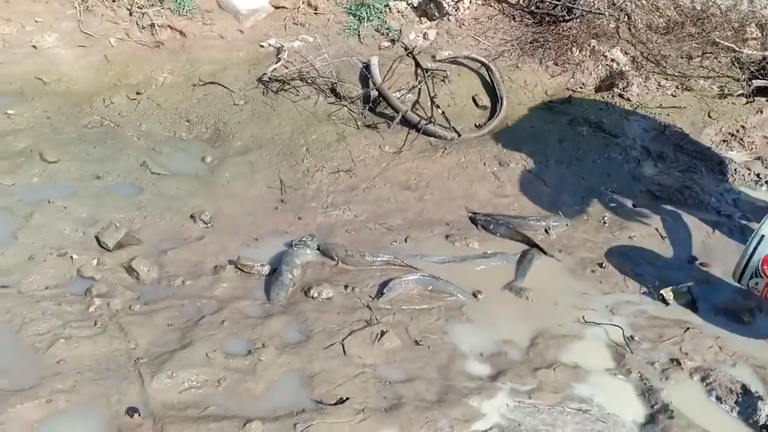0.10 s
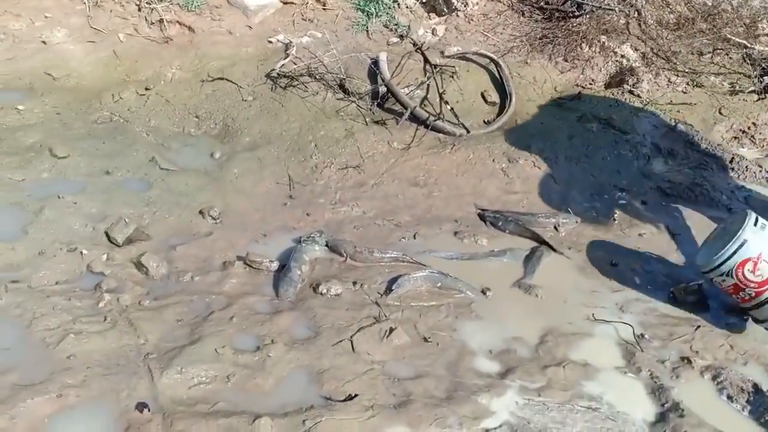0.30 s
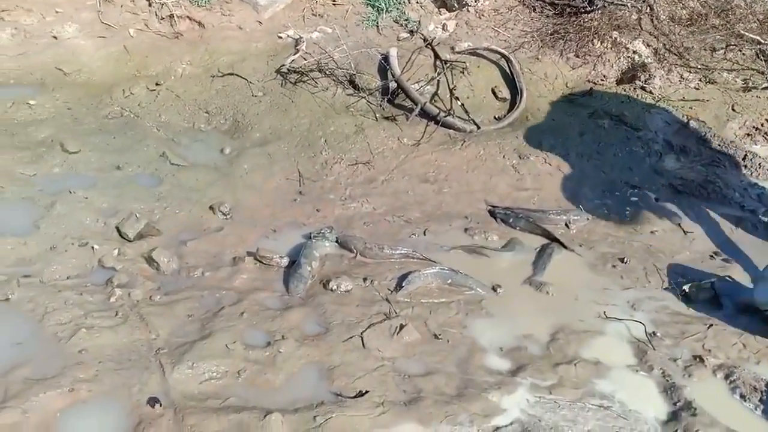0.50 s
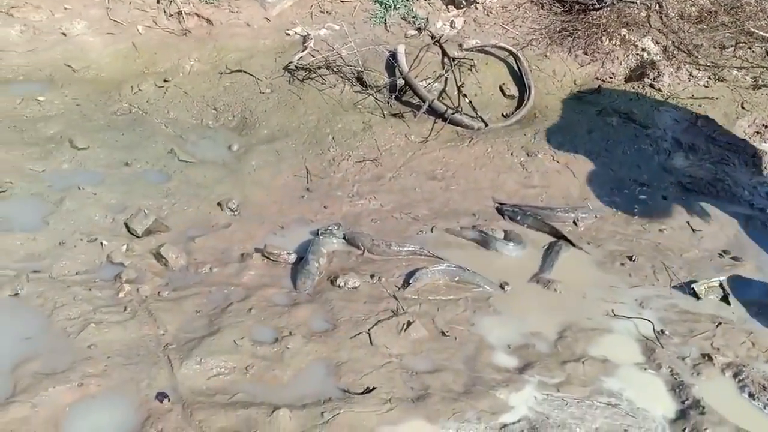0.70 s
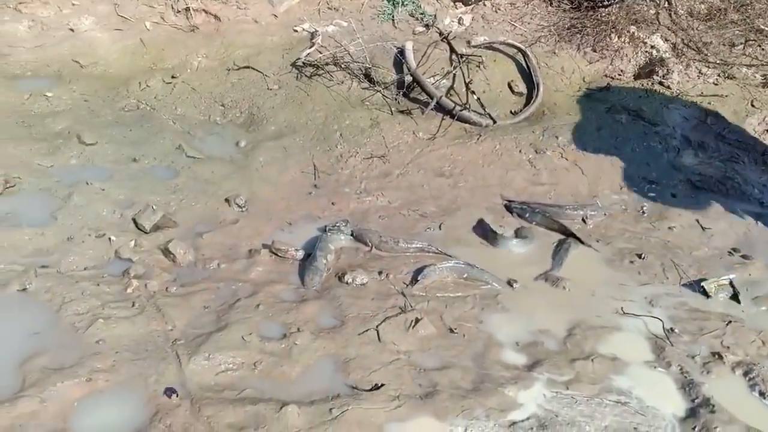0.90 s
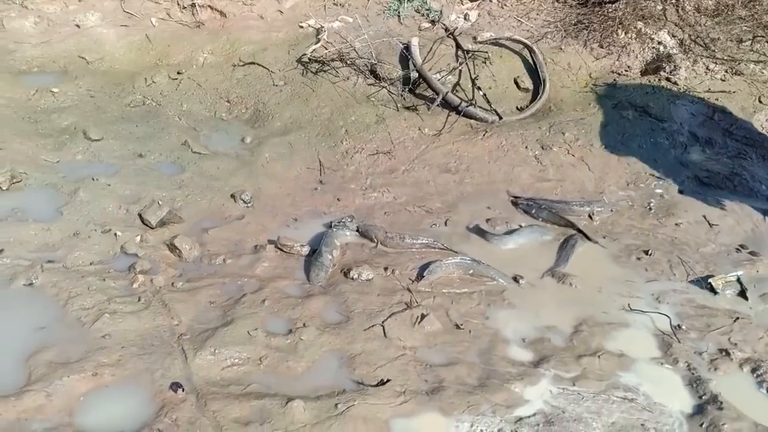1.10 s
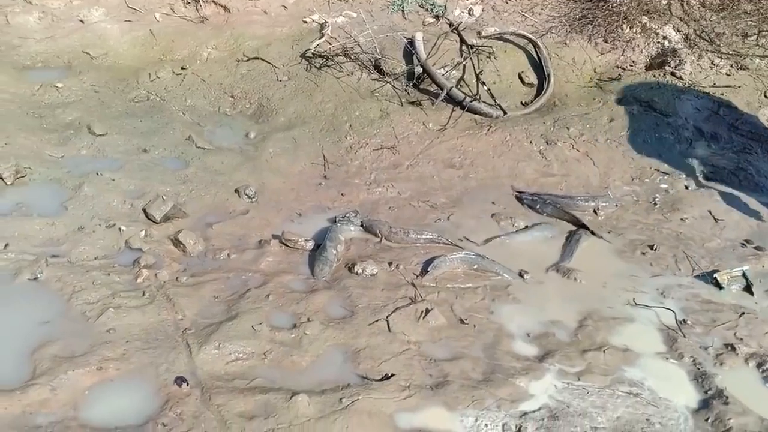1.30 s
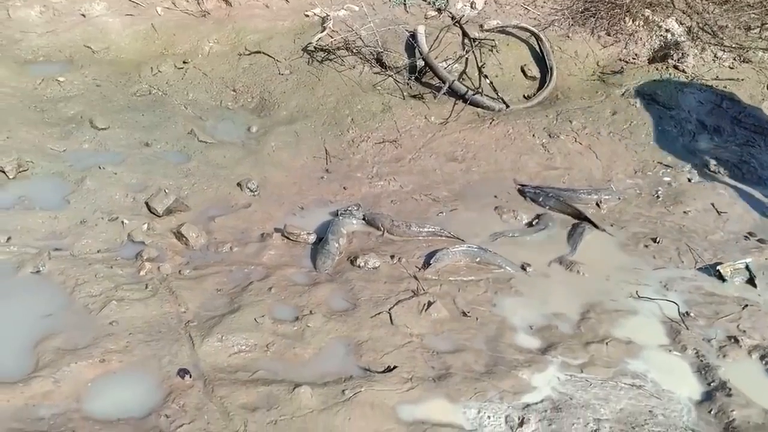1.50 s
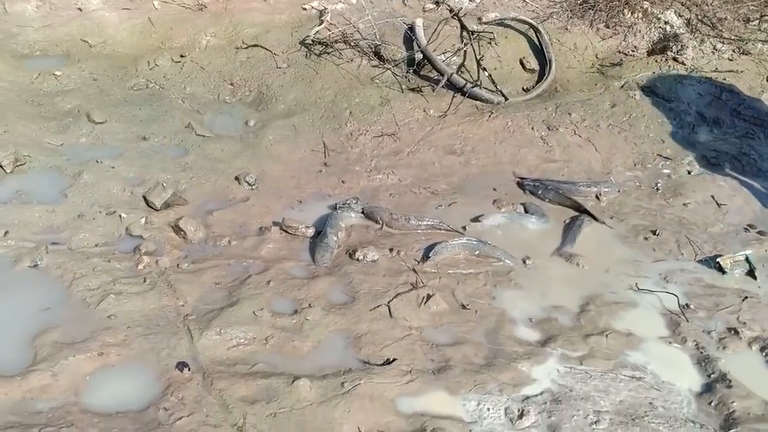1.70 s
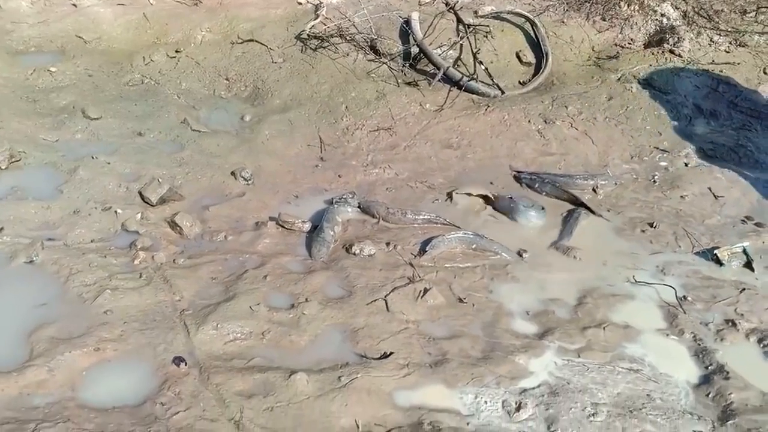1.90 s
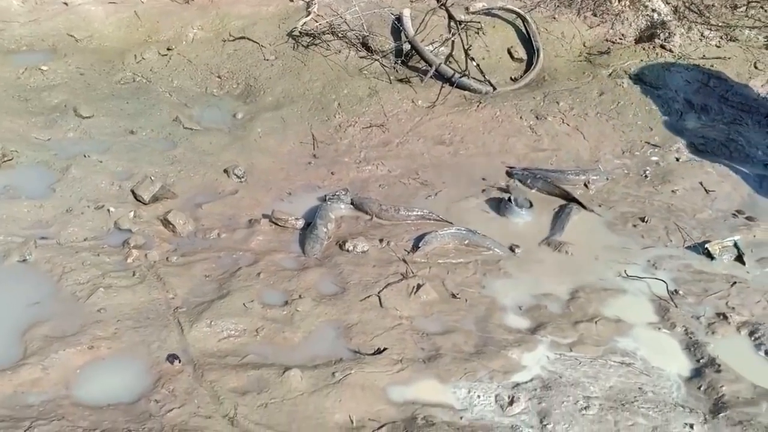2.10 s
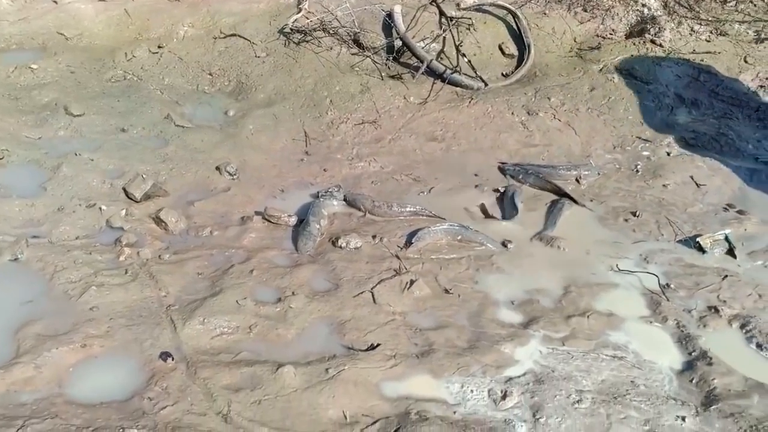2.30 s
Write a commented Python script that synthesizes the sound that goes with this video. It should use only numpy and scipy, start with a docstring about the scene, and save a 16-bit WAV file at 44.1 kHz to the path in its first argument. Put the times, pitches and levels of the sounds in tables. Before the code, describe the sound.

Water slops from a hollow plastic bucket onto wet mud in two short bursts of splashes

```python
"""Single slaps and bubbles stand out of a spatter of drops as water slops from a plastic bucket onto wet mud.
The hollow bucket thumps, close to the right of a phone held outdoors; low rumble, hum and air hiss lie beneath.
Slaps are decaying bursts of patchy noise, bubbles are damped sines of rising pitch, thumps are ringing modes.
The spatter is fluttering hiss with small random bubbles, the air is shaped noise, the hum a wavering sine."""
import sys
import numpy as np
from scipy import signal
from scipy.fft import rfft, irfft, next_fast_len
from scipy.io import wavfile
from scipy.ndimage import uniform_filter1d, map_coordinates

SR = 44100
rng = np.random.default_rng(int(sys.argv[2]) if len(sys.argv) > 2 else 0)


def magnitude_from_level(level_db):
    """Linear magnitude for a level in decibels (20 dB per decade)."""
    exponent = np.asarray(level_db, float) / 20
    return 10 ** exponent


def log_audio(samples):
    """Write samples as a 16-bit WAV file to the path given in sys.argv[1]."""
    # one column per channel
    frames = np.atleast_2d(samples).T
    # limit to full scale, then quantise
    limited = np.clip(frames, -1, 1)
    pcm = np.round(limited * 32767).astype(np.int16)
    wavfile.write(sys.argv[1], SR, pcm)


N = 105840  # length in samples

# colour of splashing water: (frequency [Hz], relative level [dB])
WATER_COLOUR = [(240, -41.5), (400, -14.5), (520, -13.5), (700, -14.5), (890, -14), (1100, -12.5),
                (1480, -11), (1670, -7.5), (2310, -3), (2870, -10.5), (3600, -19), (4100, -14), (4500, -16),
                (5000, -14.5), (5350, -13), (5800, -8), (6470, -20.5), (7670, -29.5), (10500, -41.5),
                (12500, -33.5), (14900, -33.5), (16100, -49)]
LOW_HZ, TREBLE_HZ = 1407, 3210  # edges between the low, body and treble parts of the water noise
LEFT_LAG_S = 0.00052  # the left port hears this much later


def unit(x):
    """Scaled to rms 1."""
    return x / np.sqrt(np.mean(x ** 2) + 1e-20)


def along(points, hz):
    """Reads (Hz, value) points on a log frequency axis."""
    f, v = np.transpose(points)
    return np.interp(np.log(hz + 1), np.log(f + 1), v)


def curves(rows):
    """One value per sample for each column after the time."""
    s, *columns = np.transpose(rows)
    return [np.interp(np.arange(N) / SR, s, column) for column in columns]


def wobble(rate):
    """A smooth random curve with rate knots a second."""
    knots = rng.standard_normal(int(N * rate / SR) + 4)
    return map_coordinates(knots, [np.arange(N) * rate / SR])


def filtered(x, response):
    """Multiplies the spectrum of x by a complex response of frequency."""
    m = next_fast_len(N + SR // 2)
    return irfft(rfft(x, m) * response(np.fft.rfftfreq(m, 1 / SR)), m)[..., :N]


def under(hz, edge_hz):
    """Steep low-pass gain."""
    return 1 / np.sqrt(1 + (hz / edge_hz) ** 16)


def over(hz, edge_hz):
    """Steep high-pass gain that complements under() in power."""
    return np.sqrt(1 - under(hz, edge_hz) ** 2)


def ports(hz):
    """Responses of the two ports: the far left one hears later and each has its own colour."""
    # (frequency [Hz], left over right [dB])
    left_over_right = [(300, 0.5), (550, -1), (900, 2), (1800, 5.5), (2600, 6), (3600, -1), (15000, 1.5)]
    # (frequency [Hz], phase lead of the left beside its lag [rad])
    left_lead = [(150, .3), (320, .15), (620, 1.3), (790, 1.2), (900, .4), (1150, 1.1), (1600, 1.3),
                 (2400, 1.1), (2900, -.8), (3500, .5), (4700, 1.3), (5500, -.6), (6300, 0)]
    half_db = along(left_over_right, hz) / 2
    phase = along(left_lead, hz) - 2 * np.pi * hz * LEFT_LAG_S
    return np.array([magnitude_from_level(half_db) * np.exp(1j * phase), magnitude_from_level(-half_db)])


def noise(gain):
    """Stereo noise of rms 1 under a gain of frequency, partly common to both ports."""
    # likeness of the ports: (frequency [Hz], share of the power common to both [0-1])
    alike = [(30, 0.64), (120, 1), (500, 0.66), (2000, 0.73), (6000, 0.31), (12000, 0.47)]

    def share(hz):
        return np.clip(along(alike, hz), 0, 1)

    common = filtered(rng.standard_normal(N), lambda hz: gain(hz) * np.sqrt(share(hz)) * ports(hz))
    own = filtered(rng.standard_normal((2, N)), lambda hz: gain(hz) * np.sqrt(1 - share(hz)) * abs(ports(hz)))
    return unit(common + own)


def patchy(pair):
    """Breaks stereo noise into short, narrow patches of random gain, as single droplets do."""
    depth_db = 3
    z = signal.stft(pair, nperseg=128)[2]
    field = rng.standard_normal(z.shape[1:])
    for axis in (0, 1):
        field = uniform_filter1d(field, size=3, axis=axis)
    return unit(signal.istft(z * magnitude_from_level(depth_db * unit(field)), nperseg=128)[1][:, :N])


def wet(low, body, treble):
    """Water noise in three frequency parts, each under its own envelope, later on the left."""
    shapes = (lambda hz: under(hz, LOW_HZ),
              lambda hz: over(hz, LOW_HZ) * under(hz, TREBLE_HZ),
              lambda hz: over(hz, TREBLE_HZ))
    out = np.zeros((2, N))
    for env, shape in zip((low, body, treble), shapes):
        part = patchy(noise(lambda hz: magnitude_from_level(along(WATER_COLOUR, hz)) * shape(hz)))
        out += np.array([np.roll(env, round(LEFT_LAG_S * SR)), env]) * part
    return out


def damped_bubbles(rows, longest_s):
    """Damped sines of rising pitch, as of bubbles, one per row (s, dB, Hz, t60 s)."""
    rise, attack_s = 0.16, 0.00062  # share of pitch gained over one t60; time constant of the soft start
    s, db, hz, t60 = np.transpose(rows)[:, :, None]
    t = np.arange(round(longest_s * SR)) / SR
    envelope = magnitude_from_level(db - 60 * t / t60) * (1 - np.exp(-t / attack_s))
    ring = envelope * np.sin(2 * np.pi * hz * t * (1 + rise * t / t60 / 2))
    at = np.round(s * SR).astype(int) + np.arange(len(t))
    return np.bincount(at.ravel(), ring.ravel(), N + SR)[:N]


def slaps():
    """Slaps of water on mud: short ones rise sharply, long ones softly; all die raggedly, the treble first."""
    # (time [s], level before the trim [dB], low part over body [dB], treble part over body [dB], t60 of body [s])
    hits = [(0.216, -43.5, -8, 6, 0.081), (0.22, -44, -17, 1.5, 0.07), (0.2406, -19, -5, 0, 0.04),
            (0.247, -22, -5, -12, 0.095), (0.2562, -23, 1, -4, 0.043), (0.2654, -21, -2, -14, 0.036),
            (0.2777, -28.5, -1, -11.5, 0.067), (0.3758, -26, -3, -17, 0.088),
            (0.385, -27, -2, -13.5, 0.064), (0.4867, -29.5, -2, -8, 0.14), (0.519, -31.5, -31, -12, 0.085),
            (0.5875, -28.5, -7, -7.5, 0.042), (0.5989, -22, -11, -4, 0.053),
            (0.6133, -24, -12.5, -14.5, 0.051), (0.6219, -33, -3, 0, 0.058), (0.6445, -42, 0.5, 6.5, 0.099),
            (0.6886, -33, -5, -2, 0.084), (0.7653, -45.5, 9.5, -22, 0.047), (0.79, -38.5, 4, -3.5, 0.044),
            (0.823, -36.5, -8, -9.5, 0.089), (0.8354, -37.5, -10, -16, 0.056),
            (0.8556, -31.5, -2, -17, 0.044), (0.8996, -29, -27, -14.5, 0.046),
            (0.919, -37.5, -5, -11.5, 0.045), (0.943, -45, 0.5, -28, 0.087), (1.0571, -46.5, -25, 1, 0.093),
            (1.513, -38, -25, -14.5, 0.042), (1.6863, -42.5, -19.5, -9, 0.059),
            (1.733, -41, -11.5, -13, 0.097), (1.7848, -31, -38, -21, 0.013), (1.872, -43, -29, 4, 0.15),
            (1.9087, -28, -20, -15, 0.03), (2.0456, -25, -38, -11, 0.045), (2.0593, -32, -9, -18, 0.038),
            (2.0815, -27.5, -8, -8, 0.06), (2.093, -26.5, -36, -9.5, 0.16),
            (2.1075, -24.5, -33, -4.5, 0.033), (2.11, -28.5, -6.5, 0, 0.074), (2.148, -34, -6, -7, 0.15),
            (2.1825, -38.5, -28, -6, 0.13), (2.2224, -40.5, -32, -2, 0.1), (2.3406, -43, 2.5, 6.5, 0.12)]
    trim_db, rough_db = -6, 1.2
    rise_share, treble_share = 0.017, 0.61  # rise time constant over t60; treble t60 over body t60
    power, t = np.zeros((3, N + SR)), np.arange(SR // 4) / SR
    for s, db, low_db, treble_db, t60 in hits:
        life = max(t60, 0.005) * np.array([[1], [1], [treble_share]])
        shape = magnitude_from_level(db + trim_db - 60 * t / life) * (1 - np.exp(-t / (rise_share * life)))
        start = round(s * SR)
        power[:, start:start + len(t)] += (magnitude_from_level([[low_db], [0], [treble_db]]) * shape) ** 2
    ragged = magnitude_from_level(rough_db * np.array([wobble(330), wobble(400), wobble(600)]))
    return wet(*np.sqrt(power[:, :N]) * ragged)


def single_bubbles():
    """Bubbles that stand out, each ringing at its own pitch."""
    # (time [s], level [dB], starting pitch [Hz], t60 [s])
    plops = [(.146, -53.5, 5620, 0.038), (.2435, -16, 1035, 0.044), (.2412, -16, 5590, 0.013),
             (.2495, -23, 2380, .06), (.2585, -21, 2350, .04), (.2655, -18.5, 1690, 0.038),
             (.267, -27, 503, 0.029), (.321, -31, 587, 0.021), (.350, -29.5, 567, 0.033),
             (.352, -34, 450, 0.034), (.376, -16, 2130, 0.0075), (.601, -27, 2124, 0.039),
             (.626, -36, 770, 0.026), (.652, -37.5, 710, 0.048), (.766, -35, 680, 0.016),
             (.792, -37.5, 800, 0.042), (.826, -41.5, 800, 0.078), (.8545, -22.5, 540, 0.021),
             (.855, -23.5, 1920, 0.018), (.864, -28, 2080, 0.016), (.885, -48.5, 6900, 0.016),
             (1.046, -33.5, 5560, 0.0095), (1.075, -49, 850, 0.053), (1.69, -42.5, 2250, 0.062),
             (1.786, -18, 3100, 0.008), (1.911, -32, 2004, 0.033), (1.937, -32, 2390, 0.018),
             (1.964, -36.5, 2440, 0.018), (2.006, -31.5, 2050, 0.018), (2.061, -38.5, 2140, 0.018),
             (2.099, -32, 2150, 0.019), (2.106, -27, 2267, 0.048), (2.113, -21.5, 2390, 0.017),
             (2.163, -36, 2360, 0.012), (2.186, -30, 2160, 0.022), (2.204, -36, 2340, 0.017),
             (2.224, -34, 2270, .02), (2.29, -45, 990, 0.059)]
    return damped_bubbles(plops, longest_s=0.15)


def bucket():
    """The hollow bucket: every thump rings the same dull modes anew, slightly scattered."""
    # (time [s], level before the trim [dB], t60 [s], pitch over the modes' [ratio])
    thumps = [(0.265, -18, 0.076, 0.99), (0.351, -31.5, 0.058, 0.93), (0.646, -37.5, 0.11, 1),
              (0.695, -42.5, 0.18, 0.87), (0.76, -41.5, 0.14, 0.84), (0.853, -28, 0.076, 0.97),
              (0.901, -16, 0.03, 0.95), (0.912, -31, 0.05, 0.98), (0.92, -29, 0.069, 0.88),
              (1.01, -44, 0.077, 0.9), (1.457, -44, 0.07, 1), (1.936, -43.5, 0.07, 0.97),
              (2.0455, -33, 0.03, 1)]
    # modes of the bucket: (frequency [Hz], relative level [dB], share of the thump's t60 [ratio])
    modes = [(126, -11.5, 2.45), (238, -15, 1.3), (307.8, 3.5, 1.025), (359, 3, 0.9), (501.7, -9, 1.27),
             (587, -8, 0.81), (800, -8.5, 0.61)]
    trim_db, attack_s = -4.5, 0.0025
    scatter_db, detune = 1.5, 0.03  # random spread of mode level and of pitch ratio
    out, t = np.zeros(N + SR), np.arange(SR // 3) / SR
    for s, db, t60, pitch in thumps:
        ring = np.zeros(len(t))
        for hz, level, share in modes:
            mode_db = level + scatter_db * rng.standard_normal()
            mode_hz = hz * (pitch + detune * rng.standard_normal())
            ring += magnitude_from_level(mode_db - 60 * t / max(share * t60, 0.01)) * np.sin(2 * np.pi * mode_hz * t)
        start = round(s * SR)
        out[start:start + len(t)] += magnitude_from_level(db + trim_db) * ring * (1 - np.exp(-t / attack_s))
    return out[:N]


def fizz(level_db, low_db, treble_db):
    """Small bubbles of random pitch and uneven size, ringing within the spatter."""
    trim_db, per_s, spread_db, treble_lift_db = -1.5, 1500, 3.5, 6
    middle_hz, octaves, t60_cycles = 2800, 1.2, 24  # median pitch, its standard deviation, decay
    at = np.flatnonzero(rng.random(N) < per_s / SR)
    size = rng.exponential(size=len(at))
    hz = np.clip(middle_hz * 2 ** (octaves * rng.standard_normal(len(at))), 450, 9000)
    # pitches in the low and treble parts follow the changing colour of the spatter
    low_shift_db = (low_db - np.median(low_db))[at].clip(-9, 9)
    treble_shift_db = treble_lift_db + (treble_db - np.median(treble_db))[at].clip(-9, 9)
    colour_db = along(WATER_COLOUR, hz) + (hz < LOW_HZ) * low_shift_db + (hz > TREBLE_HZ) * treble_shift_db
    drop_db = colour_db + spread_db * np.minimum(size, 2.5)
    rows = np.transpose([at / SR, drop_db, hz, t60_cycles / hz])
    ringing = unit(filtered(damped_bubbles(rows, longest_s=0.035), ports))
    return magnitude_from_level(level_db + trim_db) * ringing


def spatter():
    """Small drops: a fluttering sheet of hiss with small bubbles ringing in it."""
    # (time [s], level before the trims [dB], low part over body [dB], treble part over body [dB])
    drops = [(0.0, -70, -14, -1), (0.28, -71, 4, -2.5), (0.335, -45, -3, -9), (0.45, -45, -6.5, -9.5),
             (0.56, -51.5, -4, -5), (0.8, -55, 0, -9), (1.0, -65.5, 0, -4.5), (1.2, -71, -4, -3),
             (1.62, -66, 3, -8.5), (1.68, -58, -2.5, 0.5), (1.9, -50, -12.5, -2.5),
             (2.06, -48.5, -7.5, -3.5), (2.23, -48, -11, -6.5), (2.27, -59, -5, -5), (2.4, -63, -4, -2.5)]
    sheet_db, flutter_depth_db = -4, 2
    level_db, low_db, treble_db = curves(drops)
    flutter_db = flutter_depth_db * np.array([wobble(59.84), wobble(90), wobble(110)])
    flutter_db = flutter_db + 1.2 * wobble(30.37)  # shared by all three parts
    parts_db = np.array([low_db, 0 * low_db, treble_db])
    sheet = wet(*magnitude_from_level(level_db + sheet_db + flutter_db + parts_db))
    return fizz(level_db, low_db, treble_db) + sheet


def banks(x):
    """A short diffuse answer from the ground around: decaying noise that starts after 3 ms."""
    echo_db, t60_s = -17, 0.07
    t = np.arange(SR // 5) / SR
    tail = rng.standard_normal((2, len(t))) * magnitude_from_level(-60 * t / t60_s) * (t > 0.003)
    tail = tail / np.linalg.norm(tail[0])
    return magnitude_from_level(echo_db) * signal.fftconvolve(x, tail, axes=1)[:, :N]


def air():
    """Far rumble and hiss: steady shaped noise whose bass alone swells slowly."""
    # (time [s], bass level before the trim [dB])
    rumble = [(0.0, -62), (0.75, -58), (1.54, -60.5), (2.4, -54)]
    # (frequency [Hz], relative level [dB])
    air_colour = [(15, -55.5), (25, -35.5), (70, -12), (107, -10), (189, -8), (235, -15), (342, -16),
                  (461, -20), (691, -20.5), (749, -27), (2090, -33), (3050, -32), (3490, -45), (13100, -50),
                  (15800, -47.5)]
    trim_db, bass_hz = 2.1, 400
    level_db, = curves(rumble)
    bed = magnitude_from_level(level_db.mean() + trim_db) * noise(lambda hz: magnitude_from_level(along(air_colour, hz)))
    bass = filtered(bed, lambda hz: 1 / np.sqrt(1 + (hz / bass_hz) ** 4))
    swell = magnitude_from_level(level_db - level_db.mean() + 0.5 * wobble(15.0))
    return bed + bass * (swell - 1)


def hum():
    """A soft low sine, wavering in level and phase, that swells once."""
    # (middle [s], half length [s], frequency [Hz], level [dB])
    low_tone = (1.15, .12, 195, -63)
    middle_s, half_s, hz, db = low_tone
    t = np.arange(N) / SR
    swell = np.exp(-((t - middle_s) / half_s) ** 4)
    return magnitude_from_level(db + 2.5 * wobble(25)) * swell * np.sin(2 * np.pi * hz * t + wobble(20))


def scene():
    """Slaps, bucket and bubbles with their echo, over spatter, air and hum."""
    bass_cut_hz = 90  # the ports pass little deep bass from the thumps and bubbles

    def port_response(hz):
        return ports(hz) * (1j * hz / (bass_cut_hz + 1j * hz)) ** 3

    near = slaps() + filtered(bucket() + single_bubbles(), port_response)
    return near + banks(near) + spatter() + air() + hum()


def top_cut(x):
    """Nothing passes above the cut-off."""
    return signal.sosfilt(signal.butter(12, 16200, fs=SR, output="sos"), x)


def record(dry):
    """The phone's band limit removes everything from 15950 Hz up."""
    mix = filtered(dry, lambda hz: hz < 15950)
    return top_cut(mix)


dry = scene()
out = record(dry)
log_audio(out)
```